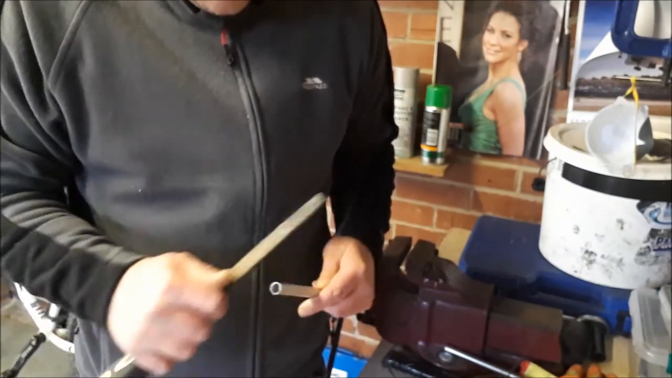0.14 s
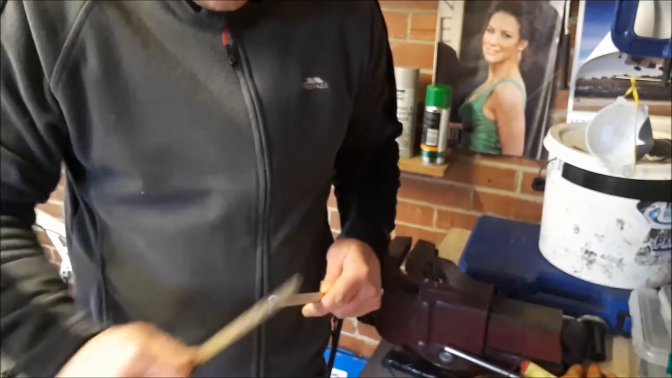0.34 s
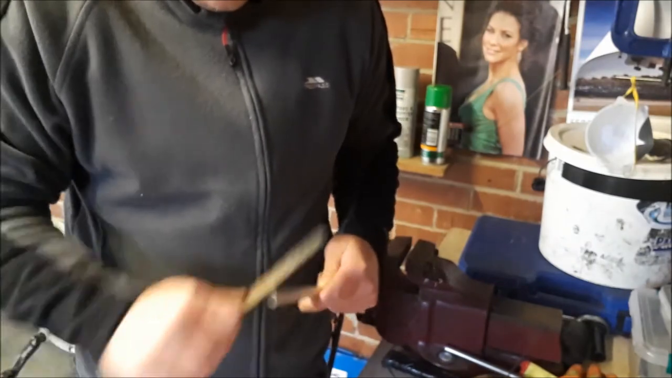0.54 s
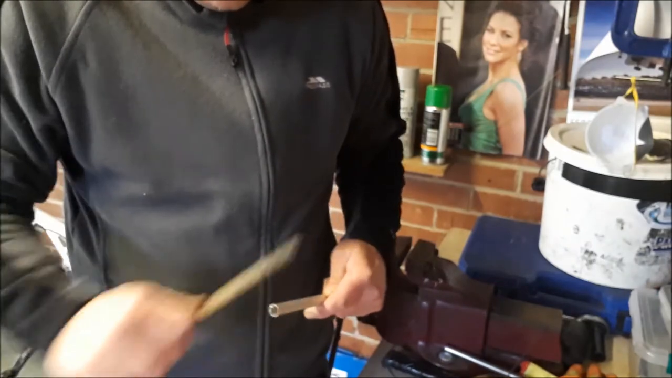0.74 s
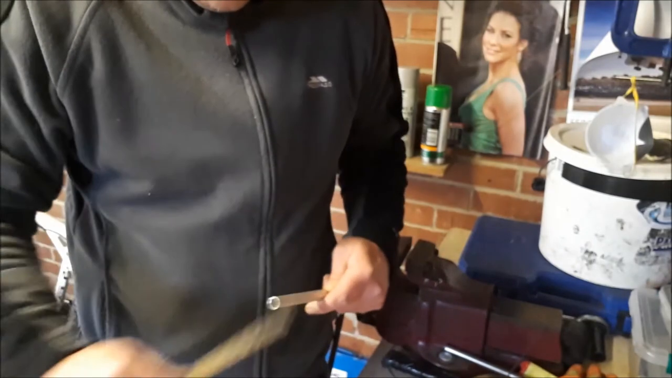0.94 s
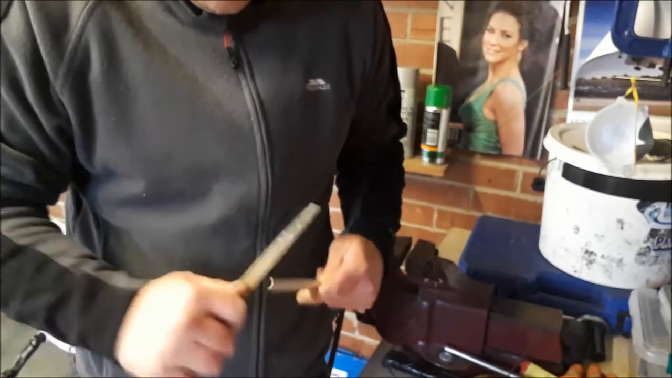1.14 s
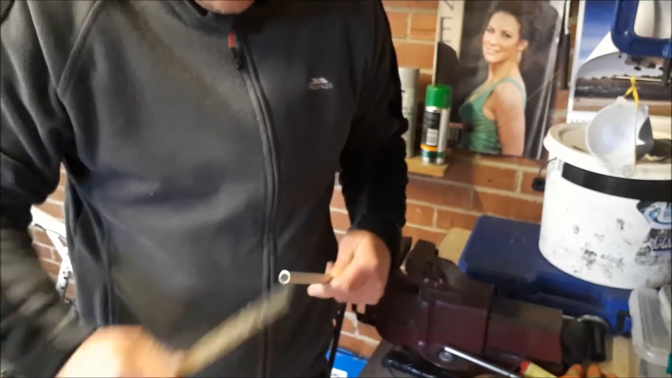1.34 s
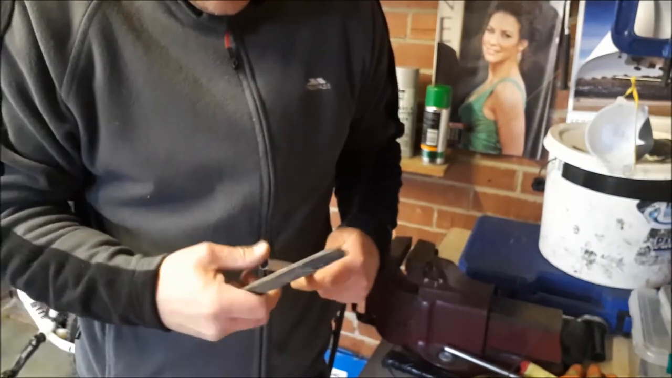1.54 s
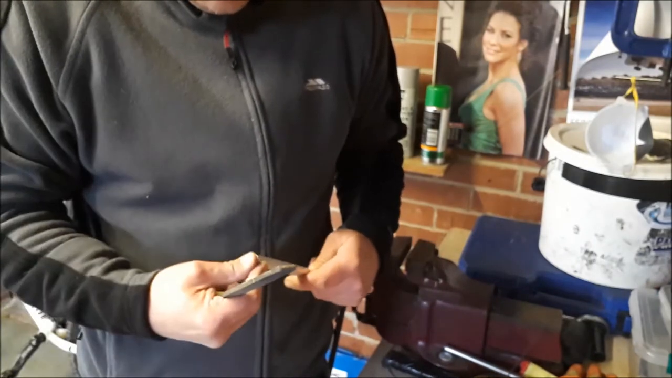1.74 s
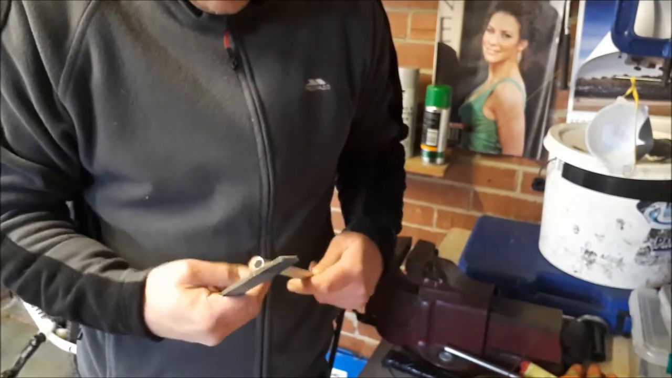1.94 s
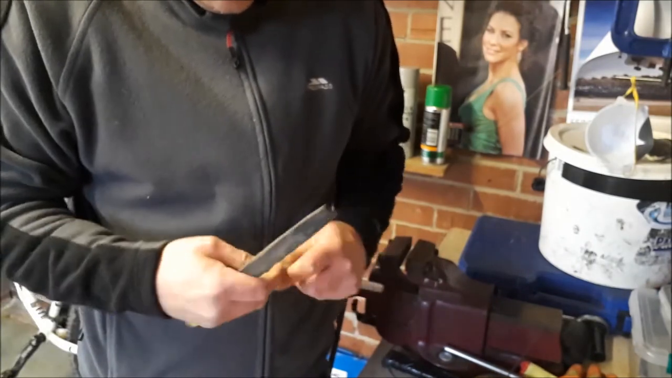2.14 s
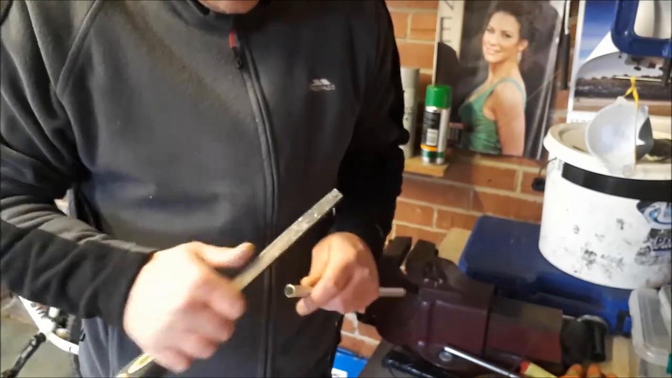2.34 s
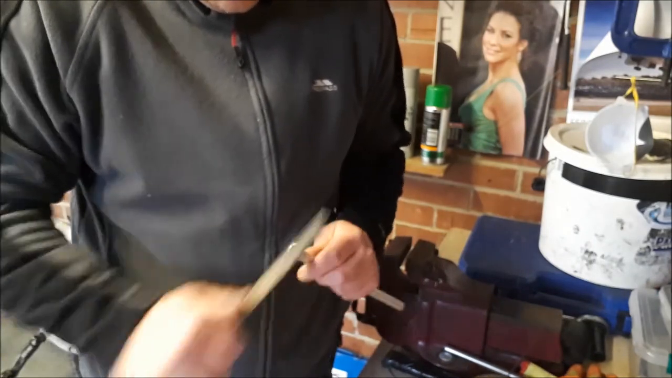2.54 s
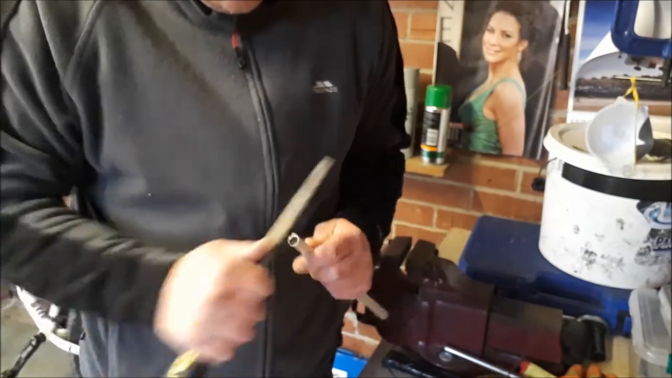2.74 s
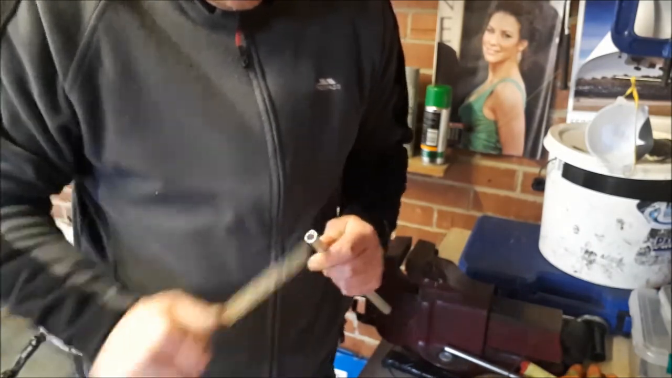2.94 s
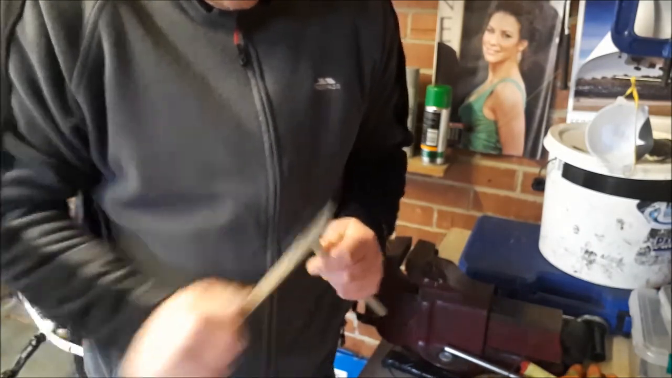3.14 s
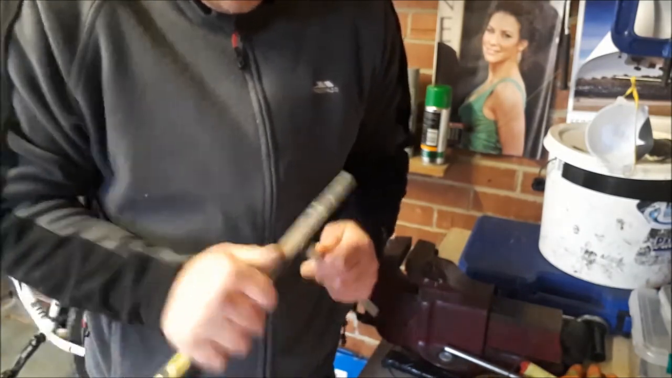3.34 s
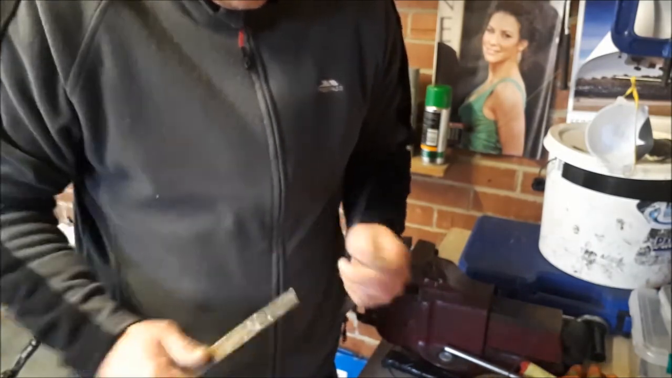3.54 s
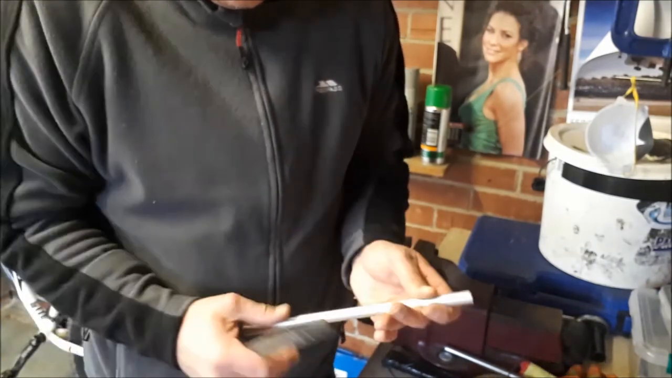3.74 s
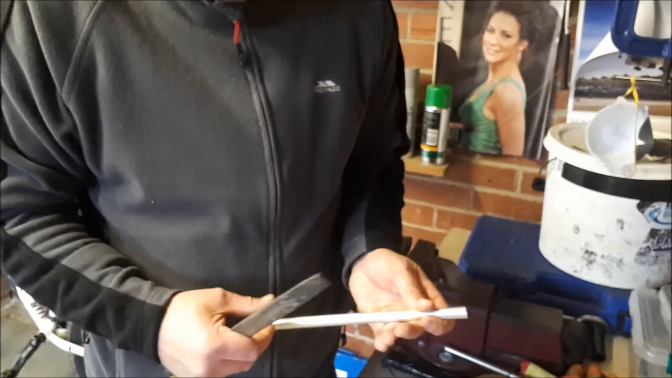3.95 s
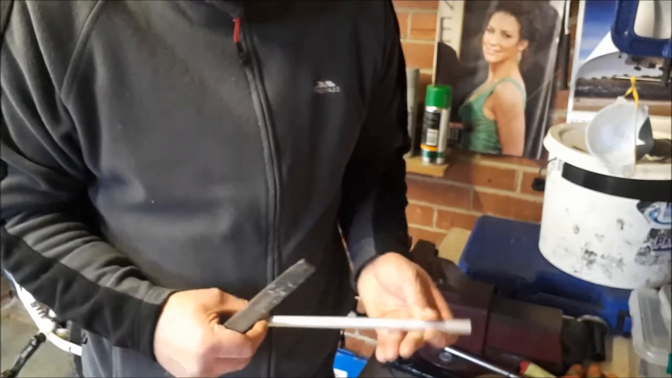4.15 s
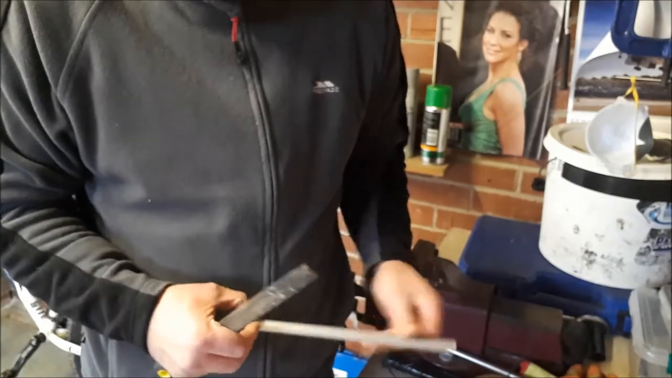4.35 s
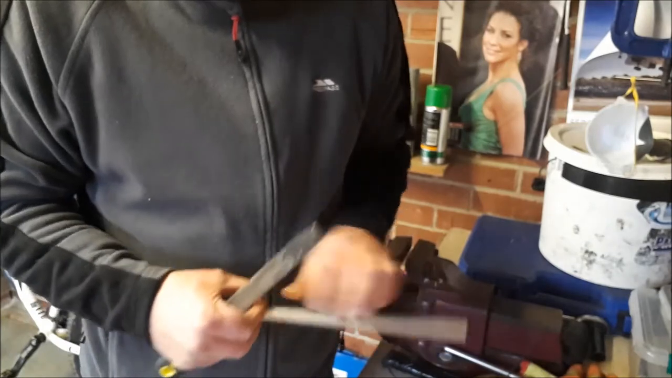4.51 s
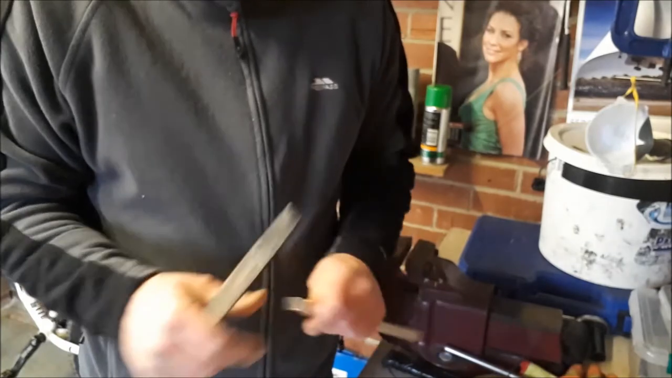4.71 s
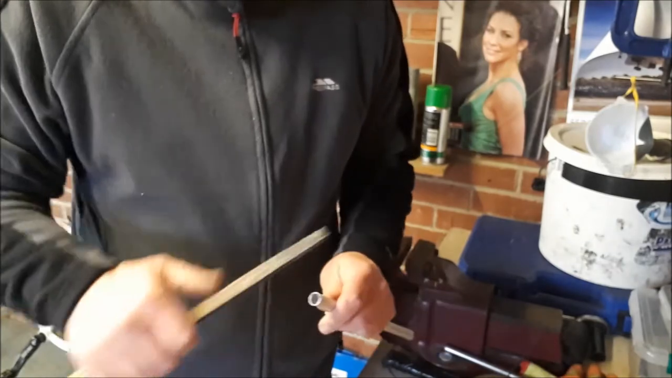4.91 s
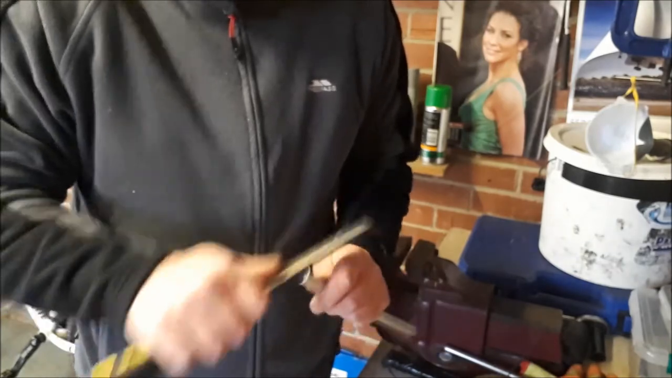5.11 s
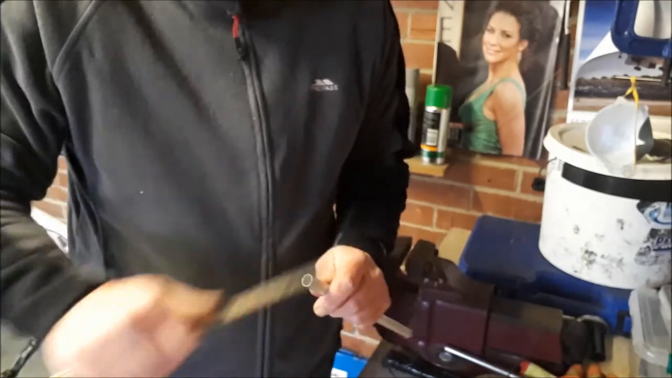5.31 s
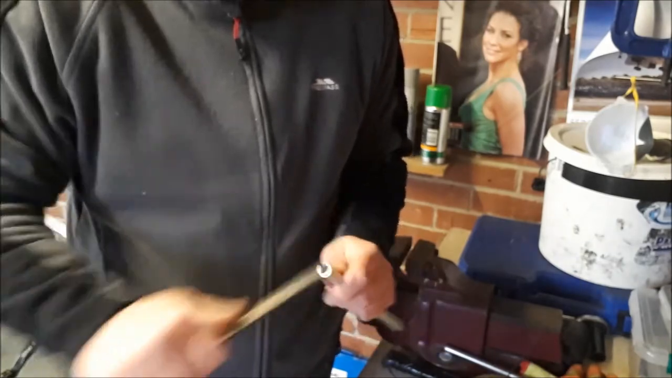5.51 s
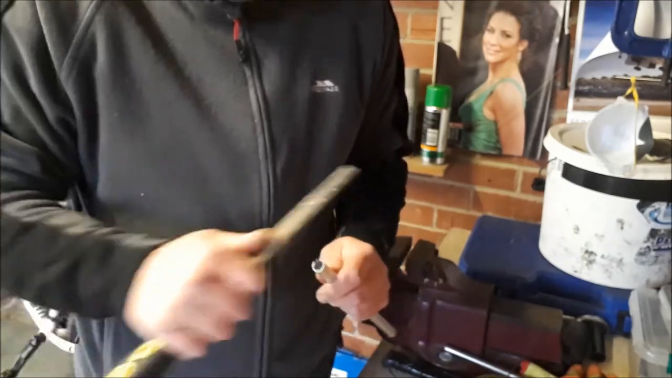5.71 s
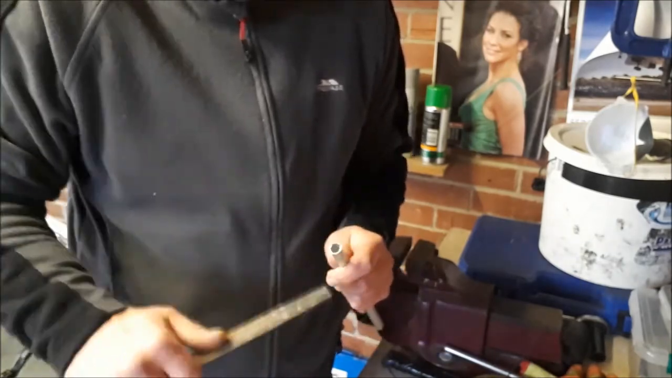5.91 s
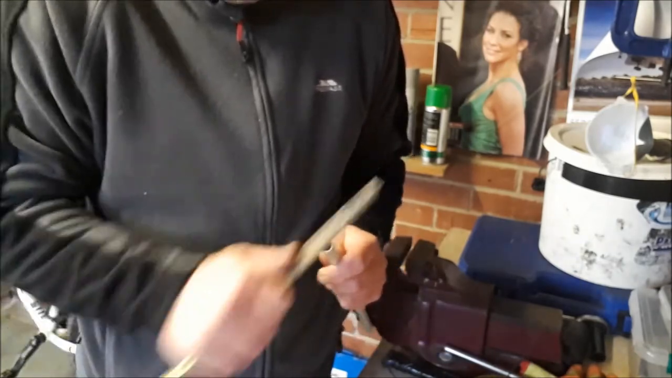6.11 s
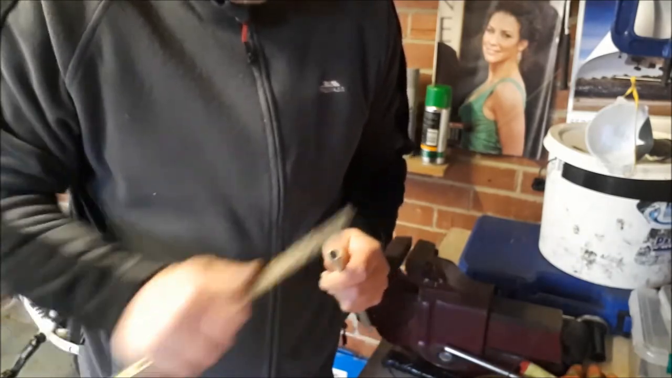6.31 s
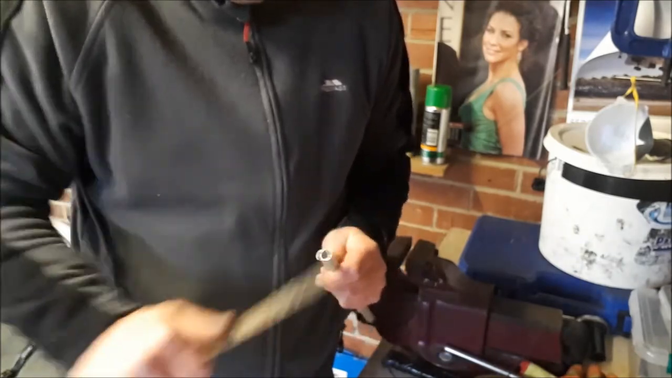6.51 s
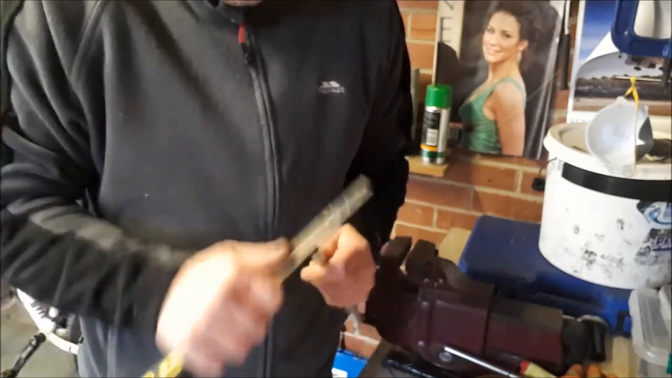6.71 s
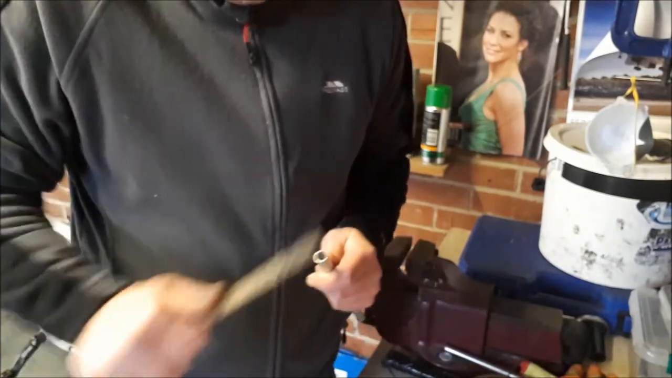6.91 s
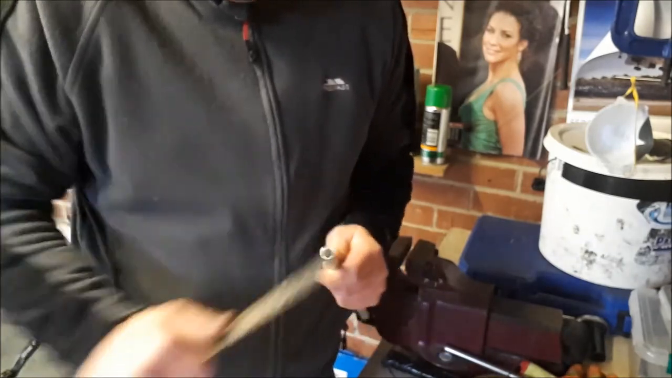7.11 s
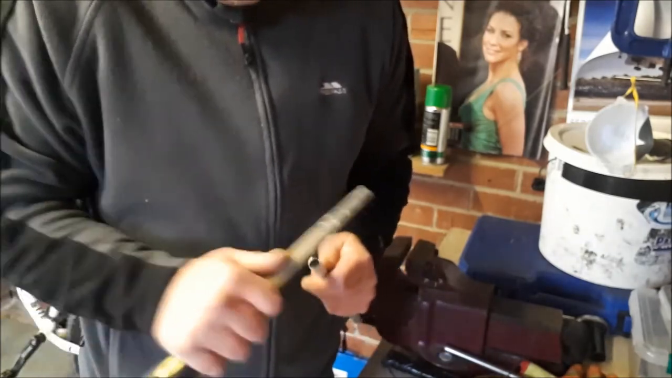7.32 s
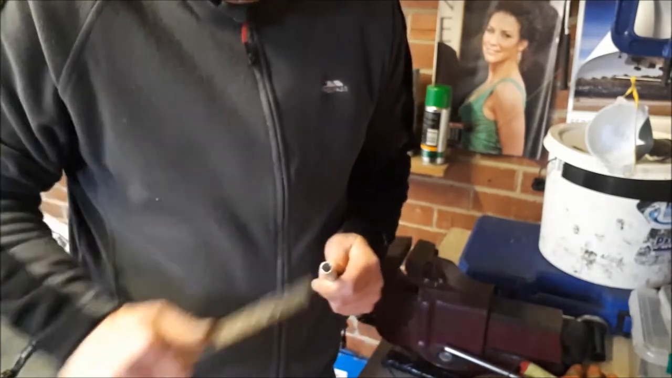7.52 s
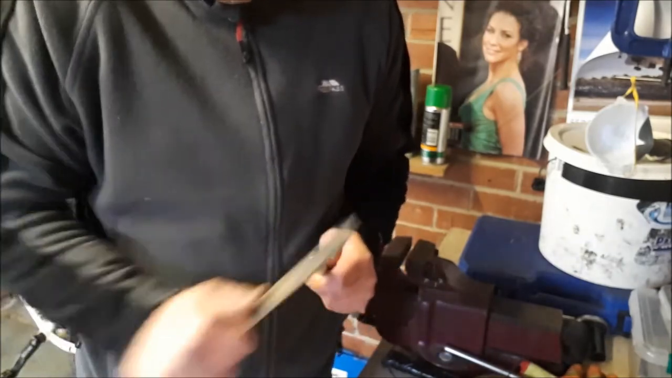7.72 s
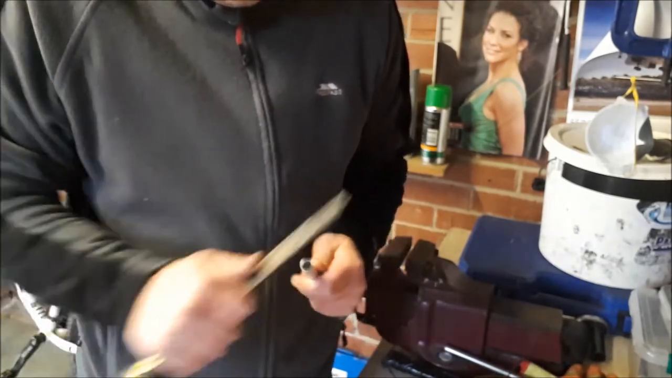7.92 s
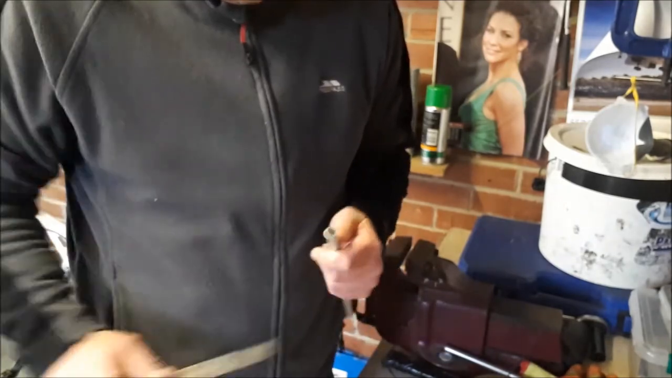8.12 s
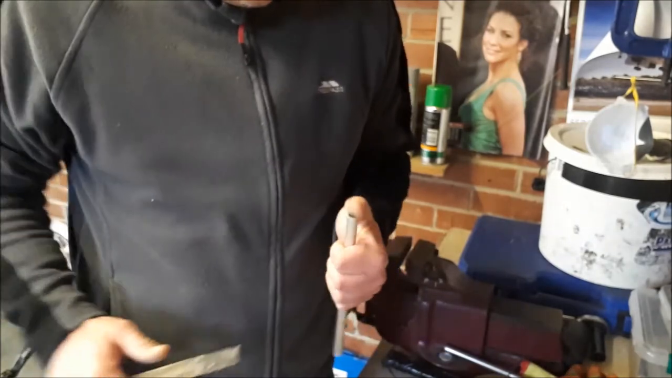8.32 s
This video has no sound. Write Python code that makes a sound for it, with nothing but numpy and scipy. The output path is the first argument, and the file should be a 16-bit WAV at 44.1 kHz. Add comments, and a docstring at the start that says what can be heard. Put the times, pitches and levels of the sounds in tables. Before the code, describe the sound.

Short, dry metal filing strokes, about three a second, come in three bursts separated by pauses of over a second. Each stroke clicks onto the rim, grates sharply and lifts away, the thin tube ringing high. Faint ticks and skin hisses mark the tube being turned. The stereo microphone is near, with brief brick-room reflections and a low steady drone behind.

```python
"""In a brick garage, a hand file is pushed across the cut end of a thin metal tube in three sets of quick strokes.
Strokes land with a tap, made of short fading tones and noise. Then the teeth bite: random clicks shake
a bank of resonances for file and tube, and the room rings on briefly as fading noise echoes.
Between sets fingers turn and rub the tube: noise ticks and soft hisses.
Below lie mains hum and a far engine, made of sine waves, and a droning appliance, made of shaped noise."""
import sys
import numpy as np
from scipy import signal
from scipy.fft import rfft, irfft, next_fast_len
from scipy.io import wavfile
from scipy.ndimage import uniform_filter1d

SR = 44100
rng = np.random.default_rng(int(sys.argv[2]) if len(sys.argv) > 2 else 0)


def wav_record(signal):
    """Record a signal, one row per channel, as 16-bit PCM in the file named by sys.argv[1]."""
    frames = np.transpose(np.atleast_2d(signal))
    bounded = np.clip(frames, -1, 1)
    # unit amplitude maps onto the largest positive 16-bit level
    quanta = np.round(bounded * 32767).astype(np.int16)
    wavfile.write(sys.argv[1], SR, quanta)


N = 373086
TIME = np.arange(N) / SR  # seconds

# The file strokes. Each row: start in seconds, gliding level in dB, lean-in time in ms, level then in dB,
# lift-off time in ms, level then in dB, tube flexing in dB against the rasp, chip hiss in dB against the rasp,
# contact pitch at the start in Hz, contact pitch at lift-off in Hz, contact strength in dB,
# gain of the tube wall ring in dB. Both times count from the start.
STROKES = [ (-0.08, -30, 30, -30, 83.7, -41.5, -4, -16.5, 2440, 2435, -8.5, 26),
           (0.259, -41, 58, -22.5, 136, -22.5, -5.5, -11, 3086, 3011, -3.5, 11),
           (0.608, -28.5, 58, -17, 111.5, -21, -7, -10.5, 3300, 2650, 0, 4),
           (0.927, -28, 33, -22.5, 72.6, -18, -7, -9.5, 3140, 3020, -2.5, 13),
           (1.23, -33, 28, -20, 74.3, -19.5, -6.5, -8, 3040, 3175, -5.5, 16),
           (2.54, -30.5, 39, -16.5, 91.4, -17.5, -9.5, -13.5, 2914, 2868, -1.5, 1),
           (2.843, -28.5, 52, -17, 93.6, -17.5, -6.5, -13.5, 2680, 2918, 3, 10),
           (3.147, -24, 54, -21, 112, -28.5, -6, -14.5, 2793, 2802, -4.5, 14),
           (3.427, -25.5, 27, -22.5, 66, -14, -7, -12.5, 2690, 2750, -7, 6),
           (5.172, -37.5, 42.6, -15.5, 119.5, -24, -8.5, -10.5, 2940, 2930, 1.1, -3),
           (5.514, -55, 18, -18.5, 71.6, -29.5, -8, -11.5, 2850, 2821, -1.5, -2),
           (5.845, -22, 80, -14, 68.6, -11.5, -4, -14, 2783, 2828, 2.3, 18),
           (6.156, -30.5, 15, -24.5, 76, -15.5, -3.5, -15, 2742, 2818, 2, 13),
           (6.47, -20.5, 36, -24, 89.4, -15, -7, -12.5, 2835, 2820, -1.5, 5),
           (6.782, -21, 24, -24, 96, -20, -6, -14, 2936, 2718, -3.5, 14),
           (7.092, -19, 60, -25, 81.3, -15.5, -9, -14, 2743, 2850, -7.5, 16),
           (7.4, -26, 68, -29, 101.3, -16, -7.5, -11.5, 2770, 2910, -5.5, 7),
           (7.718, -25.5, 31, -22, 101.7, -19.5, -8, -13.5, 2636, 2260, -6, 15),
           (8.024, -29, 34.5, -15.5, 74, -17, -7, -15, 2690, 2660, -5.5, 20), ]
# The file lands on the rim. Each row: time in seconds, knock level in dB, treble crack in dB against the knock,
# knock pitch in Hz, ring pitch in Hz.
LANDINGS = [(0.2578, -22.5, -11, 1960, 3680), (0.6066, -23.5, -24.5, 3330, 3720),
            (0.9247, -19, -13.5, 3200, 4170), (1.2287, -15.5, -15, 3330, 4030),
            (2.5391, -18.5, -25, 2330, 4180), (2.8422, -10.5, -19.5, 2624, 4045),
            (3.1452, -8.5, -22, 2612, 4050), (3.4256, -7, -10, 2858, 4250),
            (5.1708, -18, -15.5, 2860, 4430), (5.5061, -19, -17, 2695, 3664),
            (5.5257, -18.5, -18, 2960, 3740), (5.842, -12, -29, 2950, 3548),
            (6.1532, -13.5, -24, 2600, 3850), (6.467, -10.5, -11.5, 3260, 3750),
            (6.7783, -10, -19, 2742, 3623), (7.0905, -9, -10, 2710, 4160), (7.3983, -7.5, -11, 2630, 4100),
            (7.7163, -7, -13.5, 2532, 4177), (8.0207, -9.5, -21.5, 2568, 3860)]
# Low groans of the tube. Each row: start in seconds, end in seconds, level before fading in dB, pitch in Hz.
GROANS = [(7.794, 7.854, -33.5, 1136), (8.036, 8.114, -30.5, 862)]
# Light touches of tube on file or fingernail. Each row: time in seconds, strength in dB, ring pitch in Hz.
TOUCHES = [(1.458, -52, 6080), (1.725, -58, 8000), (1.7594, -44, 7750), (1.926, -52, 8200),
           (1.943, -41, 7434), (3.698, -39, 8197), (3.705, -38, 5640), (4.4097, -53, 8360),
           (4.6445, -45, 8600), (4.725, -39.5, 5500)]
# Fingers slide on the metal. Each row: start in seconds, end in seconds, level before fading in dB,
# hiss centre in Hz.
RUBS = [(1.7, 1.83, -71.5, 7550), (1.878, 1.98, -64, 7960), (2.093, 2.23, -60, 14000),
        (3.631, 3.818, -61.5, 8700), (4.0, 4.338, -82, 8400), (4.355, 4.528, -68.5, 11000),
        (4.629, 4.78, -70, 8950)]
# Ringing modes of file and tube, damped by the hands. Each row: pitch in Hz, width in Hz (see steel() for
# the narrowest), strength in dB.
STEEL_MODES = [(1303, 28, -3.5), (1580, 37, -35), (2277, 260, -14), (2456, 37, -25.5), (2596, 540, -3.5),
               (2825, 70, 1.5), (2873, 83, -8.5), (3250, 26, -65), (4110, 38, -7), (4550, 48, -11.5),
               (6800, 950, 8.5), (7460, 104, -39.5), (11500, 380, -24)]
# Tone colour of the rasp. Each row: frequency in Hz, relative level in dB per Hz.
RASP_COLOUR = [(290, -51.5), (500, -27), (807, -20.5), (1380, -15.5), (2230, -8), (2850, -3.5), (3700, -6),
               (6140, -16.5), (7420, -20.5), (12100, -20.5), (16000, -23.5)]
# How the work leans to one side. Each row: frequency in Hz, left minus right in dB.
FILE_SIDE = [(500, 0), (1200, -1), (3000, -1.5), (6400, -2), (7400, 1), (8400, 10), (10500, 7.5),
             (15000, 4.5)]
# How long the room rings. Each row: frequency in Hz, time to fall by 60 dB in seconds.
ROOM_FADE = [(800, 0.37), (2500, 0.26), (6000, 0.22), (15000, 0.15)]
# Tone colour of the drone. Each row: frequency in Hz, relative level in dB per Hz.
DRONE_COLOUR = [(25, -37.5), (55, -21.5), (100, -9.5), (140, -11), (300, -15), (460, -11.5), (860, -13.5),
                (1400, -21), (2000, -20.5), (3200, -30), (3500, -38.5), (5200, -40), (8600, -42),
                (9200, -48.5), (16000, -48)]
# Housing and room resonances in the drone. Each row: centre in Hz, width in Hz, lift in dB.
DRONE_PEAKS = [(110, 4, 8), (307, 15, 10), (415, 20, 7), (457.7, 43, 11.5), (555.6, 11, 11.5),
               (658, 28, 9.5), (876, 26, 9.5), (4050, 300, 2), (6950, 1100, 5)]
# How alike the drone is on both sides. Each row: frequency in Hz, likeness from 0 (unlike) to 1 (the same).
DRONE_LIKENESS = [(60, 0.82), (130, 1), (290, 0.74), (640, 0.87), (1400, 0.19), (3100, 0.087), (7000, 0),
                  (15000, 0)]
# How the drone leans to one side. Each row: frequency in Hz, left minus right in dB.
DRONE_SIDE = [(60, -5), (110, -2), (200, 7.5), (380, -5.5), (700, 2.5), (1290, -3), (2380, 0.5), (4400, -3),
              (8120, -0.5), (15000, 5.5)]
# The far engine. Each row: time in seconds, firing rate in Hz, level in dB, level of its second order in dB.
ENGINE = [(0, 41.7, -74, -61), (.6, 36, -70.5, -56.5), (1.5, 36.5, -69, -55.5), (2.4, 38.36, -65, -61.5),
          (3.9, 42.44, -68, -59.5), (5.1, 44.67, -68, -57), (6, 44.15, -66, -53), (6.7, 44.2, -76, -72),
          (7.5, 42.9, -82, -77), (8.46, 43.9, -88, -76.5)]
# Fall while the teeth leave the rim. The three values: tube flexing, rasp and chip hiss, each in dB.
LIFT_LOSS_DB = (16.5, 21, 23.5)

LIFT_S = 0.029  # time the teeth take to leave the rim
HISS_GROWTH_DB = 2  # from start to lift-off
SKID_DB, SKID_S = -3.5, 0.0035  # each landing skids over the teeth: level against the knock, decay time
PATCHY_DB, HOLD_DB, CHATTER_DB, FORCE_DB = 2.4, 2.6, 1.9, 2.4  # how uneven each of these is
CONTACT_WIDTH_HZ = 190
TUBE_RING_HZ, TUBE_RING_WIDTH_HZ = 8420, 45  # long thin ring of the tube wall
HANDLED_RING_DB = 13  # gain of that ring while the tube is turned in the fingers
CRACK_LAG_S = 0.0012  # the treble crack follows the knock
ROOM_DB = -9
WORK_LAG_S = 0.000025  # the left side hears the work this much later
DRONE_DB = -45
DRONE_LAG_S = 0.0003  # the drone comes from the right and reaches the left later
MAINS_HZ, MAINS_DB = 101.3, -52
CUTOFF_HZ = 16300


def amp(db):
    """Turn a level in dB into a gain."""
    return 10 ** (np.asarray(db) / 20)


def unit(x):
    """Scale a sound to an rms (average strength) of 1."""
    return x / np.sqrt(np.mean(x ** 2) + 1e-20)


def at_hz(points, hz):
    """Read a frequency table between its rows, on a log scale."""
    table = np.array(points)
    return np.interp(np.log(hz + 1), np.log(table[:, 0]), table[:, 1])


def shape(x, gain_at):
    """Change the strength of each frequency by a smooth gain."""
    size = next_fast_len(x.shape[-1])
    hz = np.arange(size // 2 + 1) * SR / size
    return irfft(rfft(x, size) * gain_at(hz), size)[..., :x.shape[-1]]


def band(x, kind, hz):
    """Keep one range of frequencies with a steep filter."""
    return signal.sosfilt(signal.butter(3, hz, kind, fs=SR, output="sos"), x)


def resonate(x, hz, width_hz):
    """Ring at one pitch, with gain 1 at its centre; a narrow width rings longer."""
    r = np.exp(-np.pi * width_hz / SR)
    feed = np.array([1, 0, -1]) * (1 - r * r) / 2
    back = [1, -2 * r * np.cos(2 * np.pi * hz / SR), r * r]
    return signal.lfilter(feed, back, x + 1e-18)


def drift(rate):
    """Wander at random around 0 with spread 1; a higher rate in Hz wanders faster."""
    r = np.exp(-32 * np.pi * rate / SR)  # drawn at every 16th sample
    noise = rng.standard_normal(N // 16 + 3002)
    slow = signal.lfilter([1], [1, -2 * r, r * r], noise)[3000:]
    return np.interp(np.arange(N) / 16, np.arange(len(slow)), unit(slow))


def pressure():
    """Each stroke glides, is leaned into, runs to lift-off and lets go; landings add a skid.

    Gives the gains of flexing, rasp and hiss, then the contact pitch and strength.
    """
    gains, contact_db = np.zeros((3, N)), np.zeros(N)
    contact_hz = np.full(N, STROKES[0][8] * 1.)  # the first stroke's starting pitch
    for (s, glide_db, lean_ms, lean_db, lift_ms, lift_db, flex_db, hiss_db,
         start_hz, lift_hz, strength_db, _) in STROKES:
        lift = s + lift_ms / 1000
        on = slice(max(round(s * SR), 0), round((lift + LIFT_S) * SR))
        t = TIME[on]
        rasp_db = np.interp(t, [s, s + lean_ms / 1000, lift], [glide_db, lean_db, lift_db])
        along = np.interp(t, [s, lift], [-.5, .5])
        leaving = np.interp(t, [lift, lift + LIFT_S], [0, 1])
        colour_db = flex_db, 0, hiss_db + HISS_GROWTH_DB * along
        skid = 0
        for at, db, *_ in LANDINGS:
            skid = skid + amp(db + SKID_DB) * (t > at) * np.exp(-np.abs(t - at) / SKID_S)
        for gain, db, loss_db in zip(gains, colour_db, LIFT_LOSS_DB):
            gain[on] = np.hypot(amp(rasp_db - loss_db * leaving), skid) * amp(db)
        contact_hz[on.start:] = lift_hz
        contact_hz[on] = np.interp(t, [s, lift], [start_hz, lift_hz])
        contact_db[on] = strength_db
    return uniform_filter1d(gains, size=60), contact_hz, contact_db


def teeth(per_s, spread_db, shared):
    """Teeth catch at random with uneven force; the two sides face partly different stretches of steel."""
    catches = rng.random((3, N)) < per_s / SR
    strength = amp(spread_db * np.minimum(rng.exponential(1, (3, N)), 4))
    common, left, right = catches * strength * rng.choice([-1, 1], (3, N))
    return unit(np.sqrt(shared) * common + np.sqrt(1 - shared) * np.array([left, right]))


def patches(force, patchy_db, rate):
    """Many close modes, as narrow bands that flare and fade as the teeth move along."""
    edges = np.geomspace(500, 17000, 31)
    out = 0
    for k, (low, high) in enumerate(zip(edges, edges[1:])):
        strip = signal.sosfilt(signal.butter(1, [low, high], "band", fs=SR, output="sos"), force)
        out = out + (-1) ** k * strip * amp(patchy_db * drift(rate))
    return out


def contact(force, hz, width_hz):
    """The resonance at the contact point slides as the file travels: slow noise carried on its pitch."""
    slow = band(force, "low", width_hz)
    other_slow = band(force[::-1, ::-1], "low", width_hz)  # backwards and with sides swapped
    phase = 2 * np.pi * np.cumsum(hz) / SR
    return unit(slow * np.cos(phase) + other_slow * np.sin(phase))


def steel(force, hold_db):
    """Every mode rings; as grip and contact point shift, each mode comes and goes on its own."""
    out = 0
    for k, (hz, width, db) in enumerate(STEEL_MODES):
        width = max(width, 60)
        mode = resonate(force * amp(db + hold_db * drift(13)), hz, width)
        out = out + (-1) ** k * mode * np.sqrt(60 / width)  # wide modes let more noise through
    return out


def filing():
    """Tooth catches shake file and tube, in three ranges that follow pressure."""
    gains, contact_hz, contact_db = pressure()
    chatter = amp(CHATTER_DB * drift(130))  # the file chatters over the rim, so the bite comes in clumps
    force = teeth(per_s=9000., spread_db=FORCE_DB, shared=0.21)
    patchy = patches(force, patchy_db=PATCHY_DB, rate=22.4)
    broad = unit(shape(patchy, lambda hz: amp(at_hz(RASP_COLOUR, hz))))
    body = broad + contact(force, contact_hz, width_hz=CONTACT_WIDTH_HZ) * amp(contact_db)
    flexing = band(body, "low", 2000)
    middle = band(body, "band", [2000, 5500])
    hiss = band(body, "high", 7140)
    rasp = chatter * sum(unit(part) * gain for part, gain in zip((flexing, middle, hiss), gains))
    return rasp + amp(1.5) * steel(rasp, HOLD_DB)


def tube_ring(work):
    """The tube wall rings more or less freely as the grip changes from stroke to stroke."""
    free_db = np.full(N, HANDLED_RING_DB * 1.)
    for s, _, _, _, lift_ms, *_, ring_db in STROKES:
        during = (TIME > s - .003) & (TIME < s + lift_ms / 1000 + LIFT_S)
        free_db[during] = ring_db
    return resonate(work * amp(free_db), TUBE_RING_HZ, TUBE_RING_WIDTH_HZ)


def garage(x):
    """Dense echoes off brick, unlike on each side, dying at a different speed in each octave."""
    age, tail = np.arange(SR // 2) / SR, 0
    for low in 500 * 2. ** np.arange(5):
        noise = band(rng.standard_normal((2, len(age))), "band", [low, 2 * low])
        tail = tail + noise * amp(-60 * age / at_hz(ROOM_FADE, np.sqrt(2) * low))
    tail = tail * (age > .004)  # the nearest wall answers first
    tail = tail / np.sqrt(np.sum(tail ** 2, axis=1, keepdims=True))
    return signal.fftconvolve(x.mean(axis=0, keepdims=True), tail, axes=1)[:, :N]


def lean(hz, side_table, lag_s):
    """Tilt a sound between left and right, and delay the left, as happens off to one side."""
    level = amp([[.5], [-.5]] * at_hz(side_table, hz))
    return level * np.exp([[-2j * np.pi], [0]] * hz * lag_s)


def drone():
    """The appliance: steady noise with housing and room resonances, most alike on both sides low down."""
    def colour(hz):
        lift = sum(db / (1 + (2 * (hz - centre) / width) ** 2) for centre, width, db in DRONE_PEAKS)
        return amp(at_hz(DRONE_COLOUR, hz) + lift)

    def likeness(hz):
        return np.clip(at_hz(DRONE_LIKENESS, hz), -1, 1)

    mid, side = rng.standard_normal((2, N))
    mid = shape(mid, lambda hz: np.sqrt(1 + likeness(hz)))
    side = shape(side, lambda hz: np.sqrt(1 - likeness(hz)))
    left_right = np.array([mid + side, mid - side])
    both = shape(left_right, lambda hz: colour(hz) * lean(hz, DRONE_SIDE, DRONE_LAG_S))
    treble = band(both, "high", 3300)
    both = both + treble * (amp(1.2 * drift(4.3)) - 1)  # the treble wavers a little
    return amp(DRONE_DB) * unit(both)


def hums():
    """Mains hum as a slightly wavering sine, and two orders of the far engine following its firing rate."""
    s, *columns = np.transpose(ENGINE)
    hz, first_db, second_db = [np.interp(TIME, s, c) for c in columns]
    phase = 2 * np.pi * np.cumsum(hz) / SR
    mains = amp(MAINS_DB + 0.56 * drift(1.5)) * np.sin(2 * np.pi * MAINS_HZ * TIME)
    engine = amp(first_db) * np.sin(phase) + amp(second_db) * np.sin(2 * phase)
    return np.sqrt(2) * (mains + engine)  # makes the levels rms levels


def landings():
    """A blunt knock, a higher ring, the treble crack just behind, and the steel ringing."""
    out, age = np.zeros((2, N)), np.arange(1500) / SR
    swell = age / 0.0011 * np.exp(-age / 0.0012)
    late_swell = np.e * np.interp(age - CRACK_LAG_S, age, swell)  # e brings its peak close to 1
    for s, db, treble_db, knock_hz, ring_hz in LANDINGS:
        knock = np.sin(2 * np.pi * knock_hz * age) * np.exp(-age / 0.0012)
        ring = amp(-4.0) * np.sin(2 * np.pi * ring_hz * age) * swell
        crack = band(rng.standard_normal((2, len(age))), "band", [3000, 12000]) * late_swell
        at = round(s * SR)
        out[:, at:at + len(age)] += amp(db) * (knock + ring + amp(treble_db) * crack)
    out = band(out, "high", 790)  # thin steel radiates no bass
    return out + amp(-2.0) * steel(out, HOLD_DB)


def handling():
    """Small touches ring as short noise through a resonance; skin sliding on metal hisses unevenly."""
    out, age = np.zeros((2, N)), np.arange(3000) / SR
    for s, db, hz in TOUCHES:
        tick = rng.standard_normal((2, len(age))) * np.minimum(age / 0.0055, 1) * np.exp(-age / 0.006)
        tick = amp(-10) * band(tick, "band", [4500, 13000]) + amp(6) * resonate(tick, hz, 450)
        at = round(s * SR)
        out[:, at:at + len(age)] += amp(db) * tick
    uneven = amp(1.7 * drift(60))  # skin sticks and slips
    for start, end, db, hz in RUBS:
        a, b = round(start * SR), round(end * SR)
        hiss = resonate(rng.standard_normal((2, b - a)), hz, .5 * hz)
        out[:, a:b] += amp(db) * unit(hiss) * np.hanning(b - a) * uneven[a:b]
    return out


def groans():
    """During two of the last strokes the loosely held tube shakes on one low mode: noise rung twice."""
    out = np.zeros((2, N))
    for start, end, db, hz in GROANS:
        a, b = round(start * SR), round(end * SR)
        shake = resonate(resonate(rng.standard_normal((2, b - a)), hz, 149), hz, 150)
        out[:, a:b] += amp(db) * unit(shake) * np.hanning(b - a)
    return out


def scene():
    """The work rings in the tube and the room, over the steady background."""
    work = filing() + landings() + handling() + groans()
    work = work + tube_ring(work)
    heard = work + amp(ROOM_DB) * garage(work)
    facing = shape(heard, lambda hz: lean(hz, FILE_SIDE, WORK_LAG_S))
    return facing + drone() + hums()


def record(dry):
    """Cut the top of the treble steeply, by 70 dB from the cutoff upwards."""
    return signal.sosfilt(signal.cheby2(14, 70, CUTOFF_HZ, fs=SR, output="sos"), dry)


dry = scene()
out = record(dry)
wav_record(out)
```